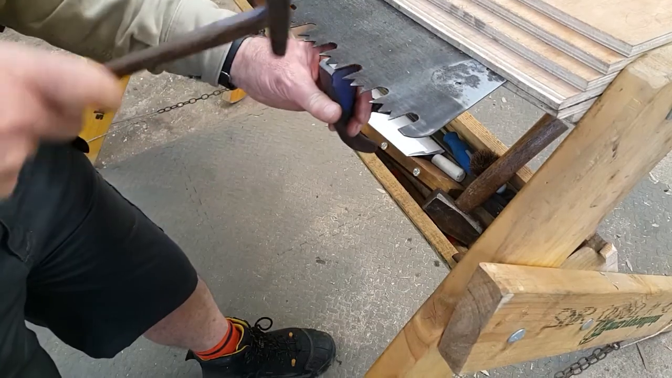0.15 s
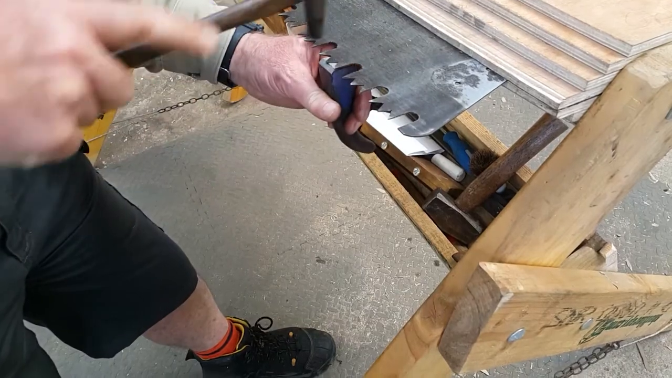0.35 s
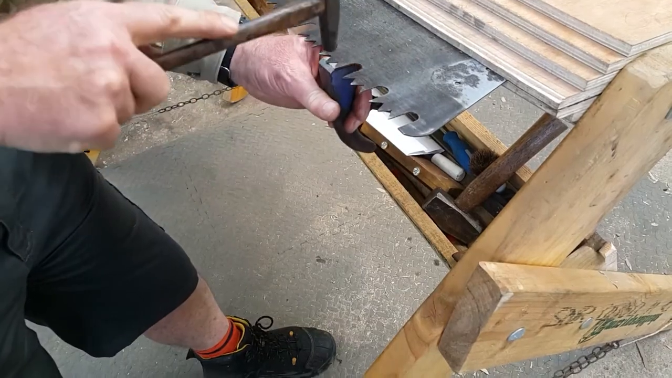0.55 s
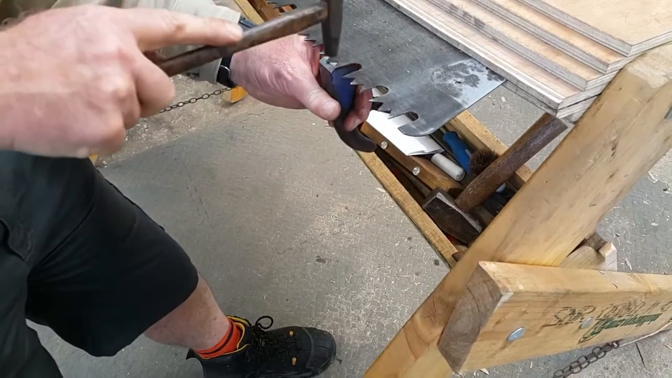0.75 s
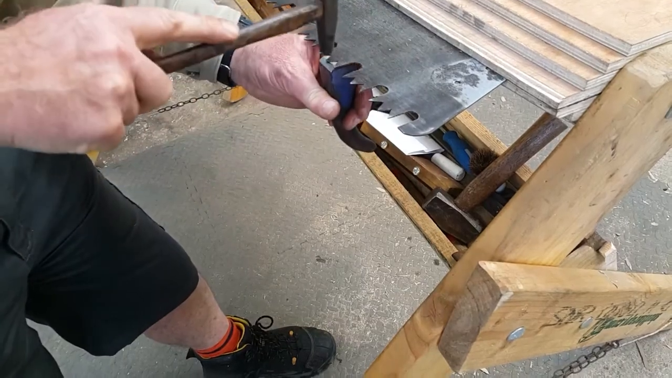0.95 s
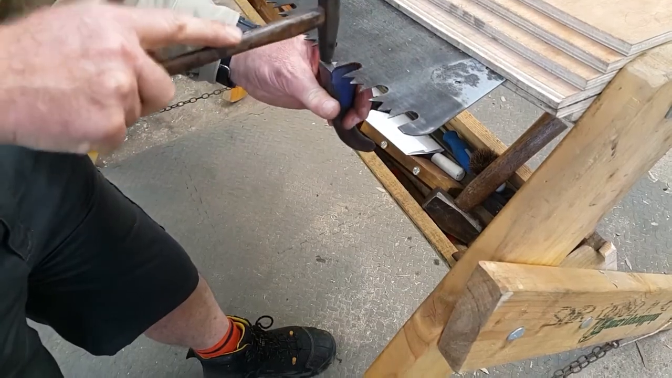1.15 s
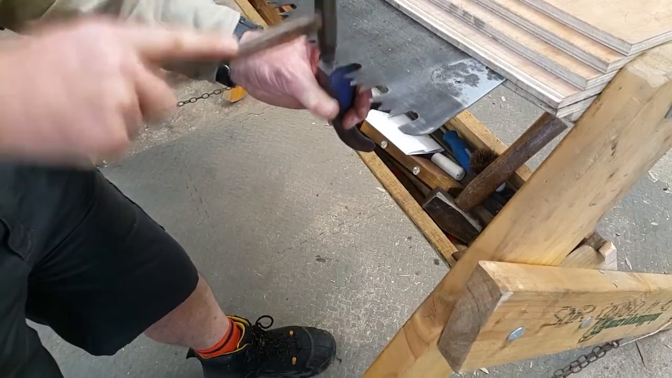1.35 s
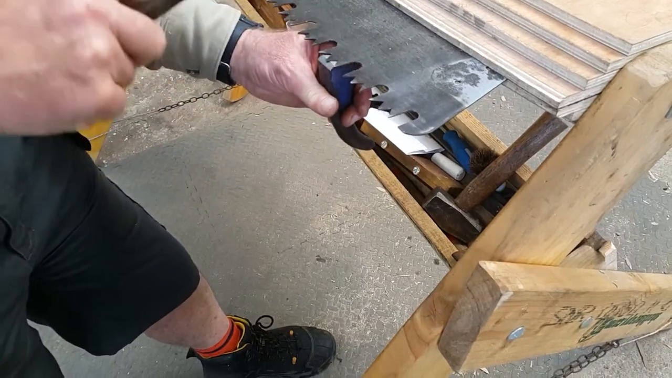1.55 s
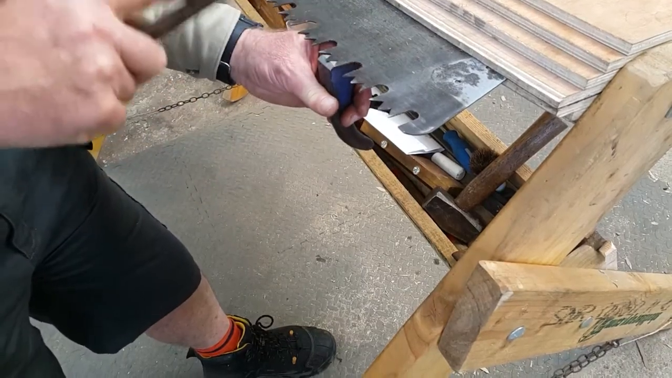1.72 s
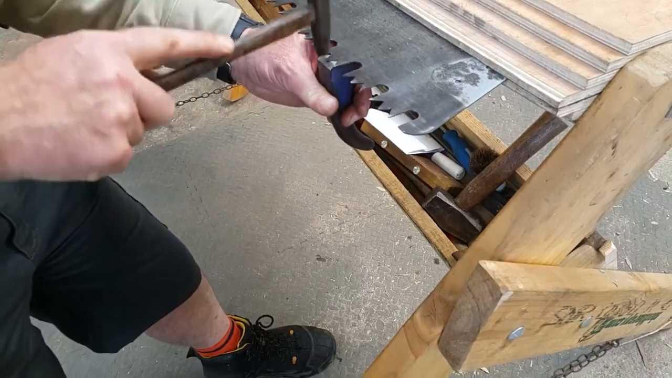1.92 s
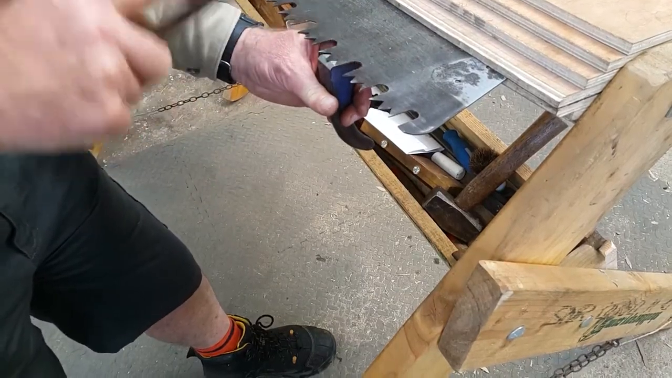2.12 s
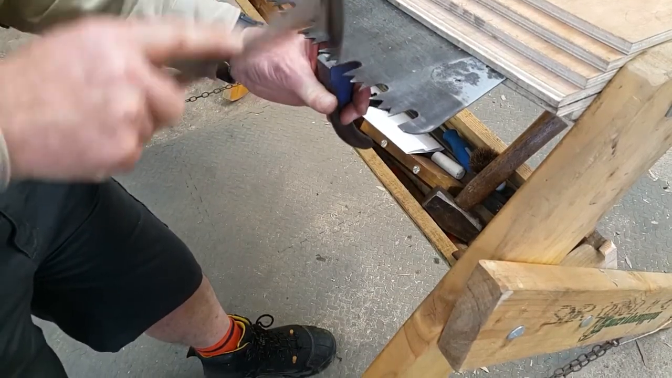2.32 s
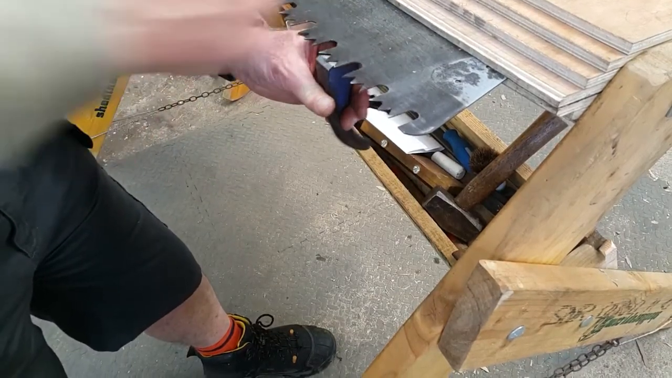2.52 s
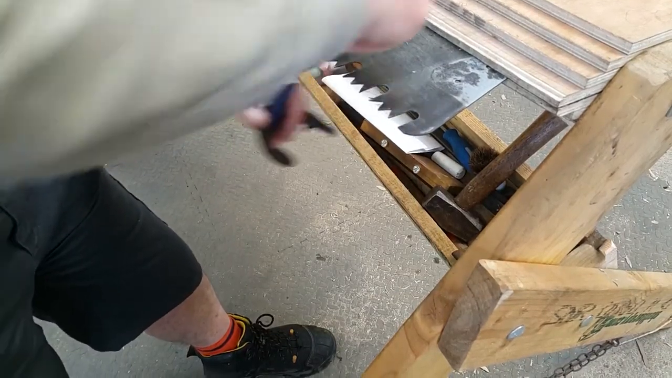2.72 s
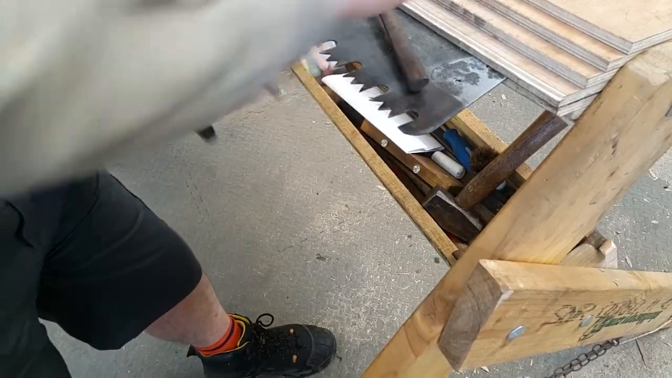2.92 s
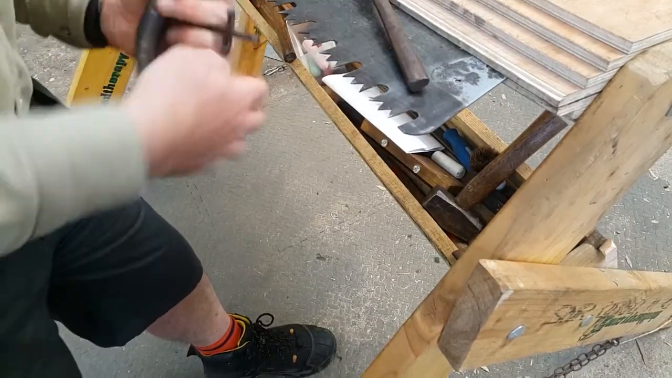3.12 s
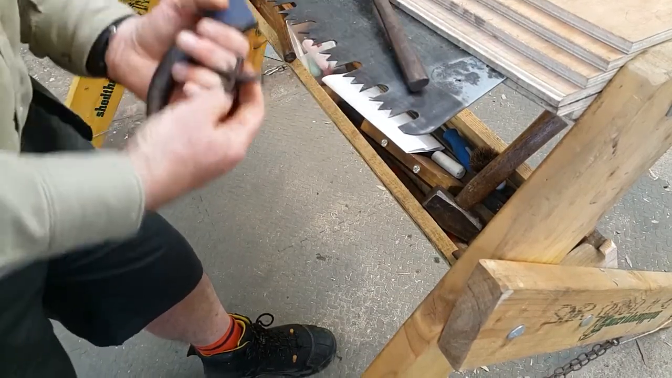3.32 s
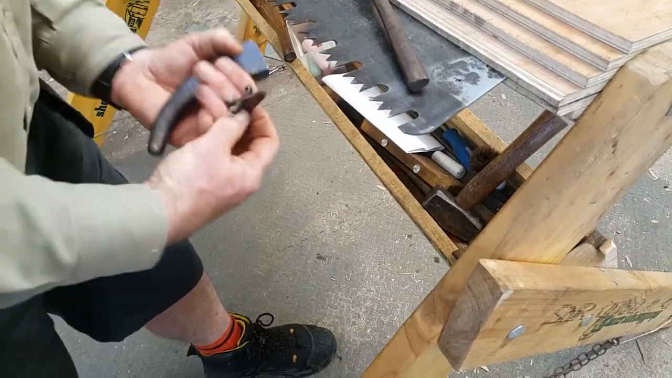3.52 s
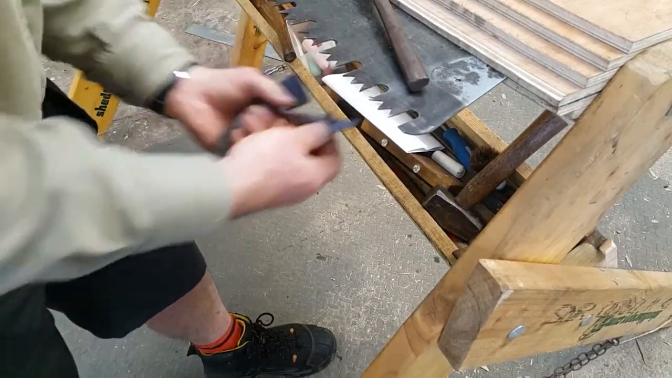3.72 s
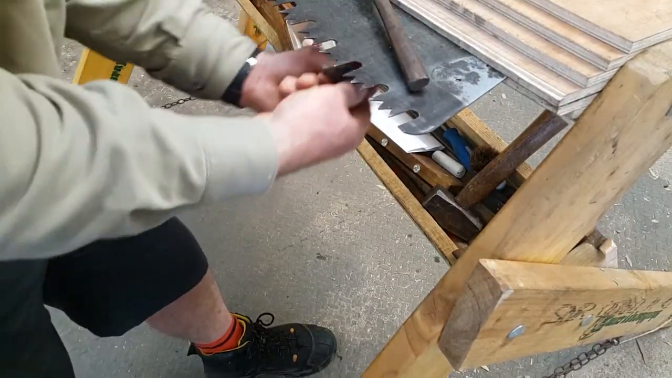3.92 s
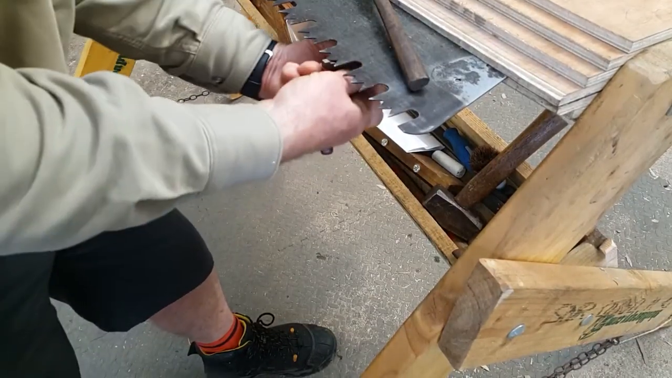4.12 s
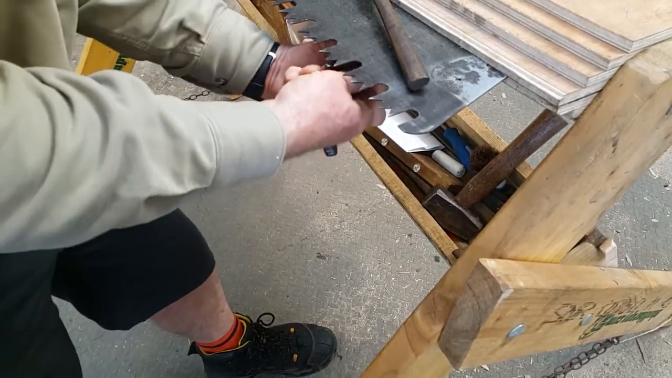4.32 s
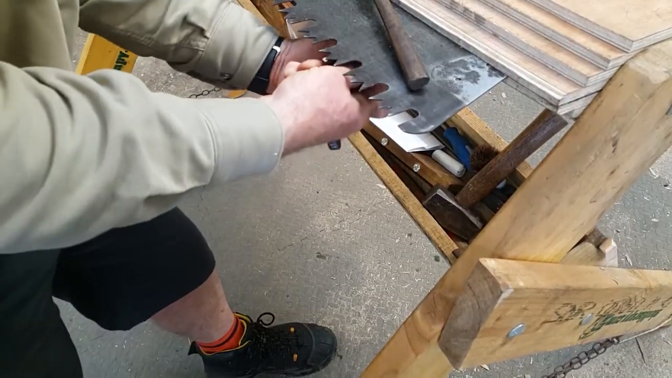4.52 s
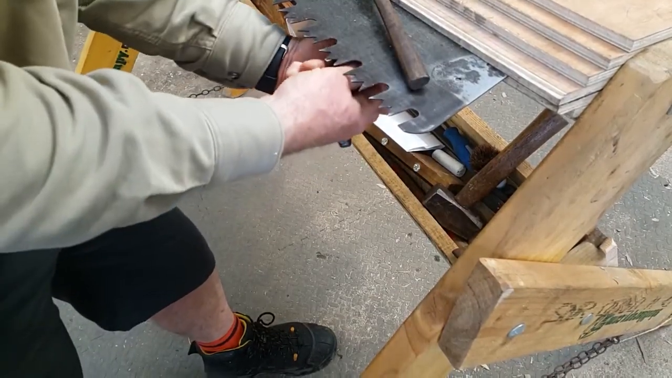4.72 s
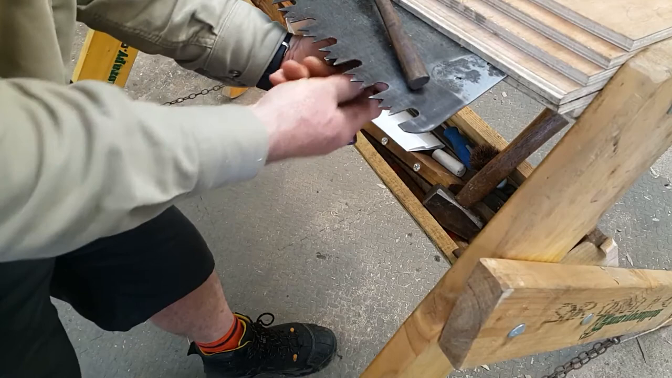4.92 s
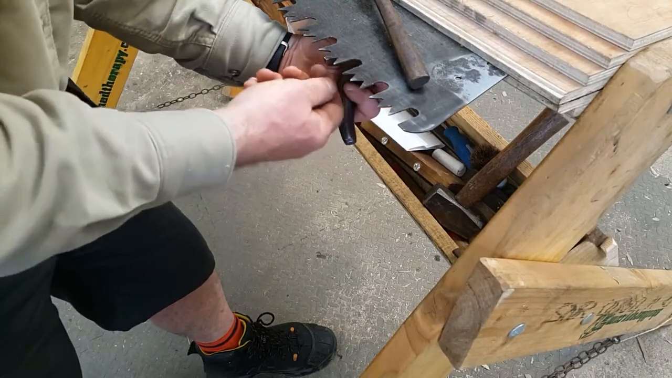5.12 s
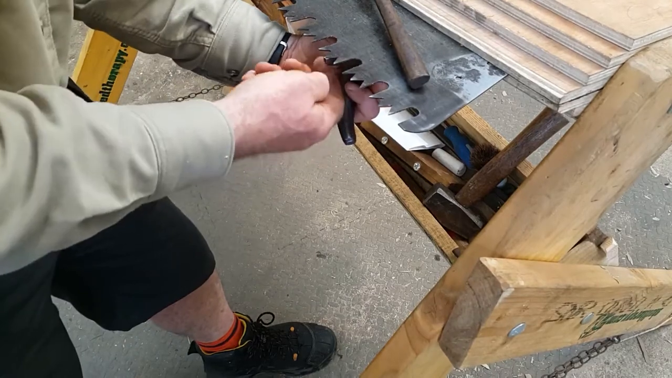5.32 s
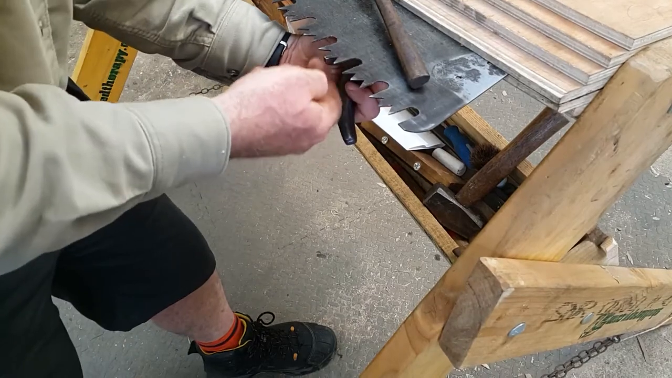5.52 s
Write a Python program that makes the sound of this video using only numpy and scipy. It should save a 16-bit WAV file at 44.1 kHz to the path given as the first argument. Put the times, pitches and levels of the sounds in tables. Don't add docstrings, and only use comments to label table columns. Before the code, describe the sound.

After soft knocks and sleeve rustle, two pairs of contacts: a low ringing metal clunk as the anvil is seated, then a loud, hard hammer blow with a short high ring and a thin blade tone singing after. A bouncing hammer clatters on a board-like bench. Handling sounds and small dry clicks finish, heard at arm's length in a reverberant workshop.

```python
import sys
import numpy as np
from scipy import signal
from scipy.fft import rfft, irfft, next_fast_len
from scipy.io import wavfile
from scipy.ndimage import uniform_filter1d, minimum_filter1d

SR = 44100
rng = np.random.default_rng(int(sys.argv[2]) if len(sys.argv) > 2 else 0)


def nominal_scale(level):
    x = np.asarray(level, float) / 20
    return 10 ** x


def to_wav(s):
    ch = np.atleast_2d(s).T
    pcm = np.round(np.clip(ch, -1, 1) * 32767)
    wavfile.write(sys.argv[1], SR, pcm.astype(np.int16))


N = 245107

# (time [s], peak [dB], dullness [dB], sparkle [dB], room [dB])
BLOW_HITS = [
    (1.51, -14, 3.5, 2, 13.5),
    (2.425, -15, -1, -2.5, 12.5),
]
# (frequency [Hz], level [dB], t60 [s])
ANVIL_MODES = [(431, -9, .12), (1779, -7, .07), (2020, -8, .04), (4254, -7, .07), (4394, 1.5, .09),
               (5185, -6, .05), (5437, -8, .06), (6112, -9, .07), (7324, -8, .06), (7997, -9, .15),
               (8031, -9, .15), (10150, -15, .09), (11051, -9, .07)]
# (frequency [Hz], level [dB per Hz])
ANVIL_COLOUR = [(60, -45.5), (200, -19.5), (290, -10), (450, -10), (760, -13.5), (1500, -10.5),
                (3000, -4.5), (4600, -4.5), (5600, 0), (7800, -5), (9000, -15.5), (12200, -11.5),
                (12900, -49.5), (16000, -60)]


def hammer_blows():
    return strike(BLOW_HITS, ANVIL_MODES, ANVIL_COLOUR, gain_db=29, ring_db=-11.5, sing_db=17,
                  edge_db=3.0, pan_db=5.3, hall_db=-29.5)


SEAT_HITS = [
    (1.166, -11.5, -5.5, 1, 10),
    (1.181, -19.5, -1.5, -6, 4.2),
    (2.119, -16.5, 2.5, -1.5, 13.7),
]
# (frequency [Hz], level [dB], t60 [s])
VICE_MODES = [(313, -9, .15), (365, -7, 0.095), (436, -2, .15), (619, -14, 0.53), (812, -12, .25),
              (920, 1, 0.28), (946, -2.5, 0.47), (1182, -7, 0.47), (1362, -14, .2)]
# (frequency [Hz], level [dB per Hz])
VICE_COLOUR = [(60, -50.5), (200, -35.5), (295, -3.5), (430, -1), (740, -11.5), (950, -8), (1500, -16),
               (3000, -18.5), (4500, -25.5), (5600, -21), (7200, -22), (9000, -37.5), (16000, -52.5)]


def anvil_seats():
    return strike(SEAT_HITS, VICE_MODES, VICE_COLOUR, gain_db=5.0, ring_db=-6, sing_db=5.5,
                  edge_db=2.0, pan_db=2.5, hall_db=-21)


DROP_HITS = [
    (2.847, -7, 2.5, 0, 9.5),
    (2.952, -14, 2.5, -7, 8),
    (3.035, -11, -12, -12.5, 4.8),
]
# (frequency [Hz], level [dB], t60 [s])
BENCH_MODES = [(432, -4, 0.22), (528.6, 7.5, 0.084), (748, -14.5, 0.39), (915, -7, 0.17), (1001, -13, 1),
               (1340, 7.5, 0.064), (1740, -17, 0.14), (2450, 4, 0.06), (4600, -2, .06), (5658, 6, 0.1),
               (6500, -3.5, .15)]
# (frequency [Hz], level [dB per Hz])
BENCH_COLOUR = [(60, -45.5), (200, -17), (280, -21), (460, 0.5), (1300, -6), (2700, -7.5), (4000, -11.5),
                (5700, -2.5), (7500, -5.5), (9000, -12), (12000, -24), (16000, -38)]


def hammer_drops():
    return strike(DROP_HITS, BENCH_MODES, BENCH_COLOUR, gain_db=12, ring_db=-9.5, sing_db=6.5,
                  edge_db=1, pan_db=0.5, hall_db=-12.5)


GAUGE_HITS = [
    (4.579, -32, 23.5, 6, 15.2),
    (4.592, -7, -18.5, -2, 1.6),
    (4.765, -20.5, 8.5, 7, 2.3),
    (4.897, -38, -7, 5, 6.5),
    (5.431, -51, 14, -9.5, 1.5),
]
# (frequency [Hz], level [dB], t60 [s])
GAUGE_MODES = [(540, 2, 0.04), (1402, -1, 0.022), (2364, -3, 0.025), (4270, -8, .02), (5600, -4, .03)]
# (frequency [Hz], level [dB per Hz])
GAUGE_COLOUR = [(60, -43), (200, -18), (300, -11), (550, 2.5), (1400, -1.5), (3000, -8.5), (4400, -7.5),
                (5800, -1), (7500, -7), (9500, -17.5), (16000, -39)]


def gauge_clicks():
    return strike(GAUGE_HITS, GAUGE_MODES, GAUGE_COLOUR, gain_db=0.96, ring_db=-18, sing_db=3.5,
                  edge_db=3.0, pan_db=2.0, hall_db=-10.5)


TAP_HITS = [(0.148, -38, 6.5, -13, 13.4), (0.228, -15, -4.2, 1.8, 7.6), (0.269, -28.5, 6, 11, 10.6),
            (0.439, -41, -4, 6, 13), (0.55, -45, -19, -3, 11), (3.311, -41, -3, -14, 3),
            (4.151, -38.5, -12, -3, 8.1), (4.339, -49.5, 13, 8, 25)]
# (frequency [Hz], level [dB], t60 [s])
WOOD_MODES = [(292, -8.5, 0.17), (458, -9.5, 0.1), (684, -13, 0.16)]
# (frequency [Hz], level [dB per Hz])
WOOD_COLOUR = [(60, 5), (200, -25.5), (282, -5.5), (540, -10.5), (1500, -13), (3500, -15), (5800, -16.5),
               (8000, -23.5), (16000, -32)]


def wood_taps():
    return strike(TAP_HITS, WOOD_MODES, WOOD_COLOUR, gain_db=-3.0, ring_db=-6.5, sing_db=8.0,
                  edge_db=-4.0, pan_db=2.1, hall_db=-24)


# (time [s], level [dB], hold [s], t60 [s])
BLADE_SWELLS = [
    (1.515, -28, 0.041, 0.77),
    (2.125, -47.5, 0.051, 0.58),
    (2.43, -26, 0.06, 0.42),
    (3.32, -60.5, 0.34, 1.9),
]


def blade():
    t = np.arange(N) / SR
    size = np.zeros(N)
    for start, db, hold_s, t60 in BLADE_SWELLS:
        since = np.maximum(t - start, 0)
        rise = 1 - np.exp(-since / (0.067 * hold_s))
        swell = rise * fade(np.maximum(since - hold_s, 0), t60)
        size = np.where(t < start, size, nominal_scale(db) * swell)
    hz = 1201 + 3.5 * (t - 2.5)
    ear_phase = np.array([[0], [.6]])
    return size * np.sin(2 * np.pi * np.cumsum(hz) / SR + ear_phase)


# (peak time [s], length [s], rub [dB], cloth [dB])
HAND_RUBS = [(0.425, 0.22, -63.5, -57.5), (0.638, 0.14, -66, -64), (.88, 0.036, -80, -59.5),
             (3.346, 0.055, -71, -112), (3.634, .14, -68.5, -61), (3.93, 0.58, -66, -62.5),
             (4.179, 0.057, -47, -64), (4.265, .12, -64.5, -77), (4.397, 0.24, -68, -80)]
# (time [s], length [s], frequency [Hz], level [dB])
EDGE_SQUEAKS = [
    (3.668, 0.13, 8700, -72),
    (4.174, 0.033, 8300, -63),
    (4.347, 0.022, 8130, -63),
]
# (frequency [Hz], width [Hz], level [dB])
RUB_BANDS = [(572, 310, 0), (1087, 260, -5), (1100, 1780, -2.5)]


def handling():
    t = np.arange(N) / SR
    grains = stereo_noise(N) * nominal_scale(2.9 * walk(90))
    rub = 0
    for hz, width, db in RUB_BANDS:
        rub = rub + nominal_scale(db) * band(grains, hz - width / 2, hz + width / 2) / np.sqrt(width)
    rub = rub / rub.std()
    cloth = band(grains, 4580, 7650)
    cloth = cloth / cloth.std()
    out = 0
    for peak_s, length, rub_db, cloth_db in HAND_RUBS:
        side = length * np.where(t < peak_s, 0.42, 0.58)
        gesture = np.exp(-((t - peak_s) / side) ** 2)
        out = out + gesture * (nominal_scale(rub_db) * rub + nominal_scale(cloth_db) * cloth)
    for centre, length, hz, db in EDGE_SQUEAKS:
        edge = band(rng.standard_normal(N), hz - 2 / length, hz + 2 / length, order=1)
        out = out + nominal_scale(db) * np.exp(-((t - centre) / length * 2) ** 4) * edge / edge.std()
    return out


# (frequency [Hz], level [dB per Hz])
HISS_COLOUR = [(25, -17), (60, -12), (200, -12), (271, -6), (355, -10), (650, -10.5), (1070, -18),
               (2800, -20), (4300, -23), (5700, -6), (7000, -16), (8500, -26.5), (12000, -25),
               (16000, -33.5)]
# (frequency [Hz], level [dB])
HUM_TONES = [(269, -82), (657, -75)]


def background():
    hiss = colour(stereo_noise(N), HISS_COLOUR)
    hiss = nominal_scale(-61.5 + 0.27 * walk(2.0)) * hiss / hiss.std()
    t = np.arange(N) / SR
    hum = 0
    for hz, db in HUM_TONES:
        hum = hum + nominal_scale(db + 4 * walk(2.5)) * np.sin(2 * np.pi * hz * t + 1.2 * walk(5))
    return (hiss + hum) * nominal_scale(0.82 * np.array([[-.5], [.5]]))


def drop_top(x):
    return signal.sosfilt(signal.ellip(8, .2, 60, 12500, fs=SR, output="sos"), x)


def mode_rings(modes, ring_db):
    t = np.arange(SR // 4) / SR
    rings = np.array([nominal_scale(db) * np.sin(2 * np.pi * hz * t) * fade(t, t60) for hz, db, t60 in modes])
    return nominal_scale(ring_db) * drop_top(rings) / np.sqrt(np.sum(rings ** 2))


# (low edge [Hz], high edge [Hz], t60 [s])
RATTLE_BANDS = [(60, 780, 0.079), (710, 3390, 0.041), (2700, 7450, 0.021), (8640, 9400, .0055)]


def contact_rattle(size):
    t = np.arange(size) / SR
    noise = rng.standard_normal(size)
    return sum(band(noise * fade(t, t60), lo, hi) / np.sqrt(t60) for lo, hi, t60 in RATTLE_BANDS)


def strike(table, modes, tone, gain_db, ring_db, sing_db, edge_db, pan_db, hall_db):
    rings = mode_rings(modes, ring_db)
    near, far, size = np.zeros(N + SR), np.zeros(N + SR), 4096
    edge = read([(500, 0.028), (5500, edge_db), (14000, edge_db + 12.5)], size)
    for start, peak_db, dull_db, sparkle_db, room_db in table:
        touch = [(400, dull_db), (1400, 0.42 * dull_db), (4500, 0.016), (11000, sparkle_db)]
        db = read(tone, size) + read(touch, size)
        ring = nominal_scale(2 * rng.standard_normal(len(modes))) @ rings
        burst = signal.fftconvolve(contact_rattle(size), pulse(db + edge))
        burst = burst / np.abs(burst).max()
        level_db = peak_db + gain_db
        i = int((start + .0012) * SR)
        near[i:i + len(burst)] += nominal_scale(level_db - 2.5) * burst
        near[i:i + len(ring)] += nominal_scale(level_db + sing_db) * ring
        far[i:i + size] += nominal_scale(level_db + room_db) * pulse(db)
        far[i:i + len(ring)] += nominal_scale(level_db + room_db) * ring
    echoes = room(build_s=.008, patchy_db=3, hall_db=hall_db)
    wet = signal.fftconvolve(drop_top(far)[None, :N], echoes, axes=1)[:, :N]
    late = np.roll(near, 2)
    direct = np.array([nominal_scale(pan_db / 2) * late, nominal_scale(-pan_db / 2) * near])
    return direct[:, :N] + wet


# (frequency [Hz], t60 [s])
ROOM_DECAY = [(150, 0.49), (400, 0.36), (1200, 0.46), (3500, 0.36), (7000, 0.28), (12000, 0.17)]


def room(build_s, patchy_db, hall_db):
    t = np.arange(SR * 2 // 3) / SR
    noise = stereo_noise(len(t))
    hz, t60 = np.transpose(ROOM_DECAY)
    out = 0
    for f in 90 * 2 ** np.arange(0, 7.6, .5):
        decay = fade(t, np.interp(np.log(f), np.log(hz), t60))
        out = out + band(noise, f / 2 ** .25, f * 2 ** .25, order=1) * decay
    out = out + nominal_scale(hall_db) * band(noise[:, ::-1], 330, 8700) * fade(t, 0.95)
    clumps = nominal_scale(patchy_db * walk(250)[:len(t)] * fade(t, .6))
    out = out * clumps * (1 - np.exp(-(t / build_s) ** 2))
    return out / np.sqrt(np.mean(np.sum(out ** 2, axis=1)))


# (frequency [Hz], likeness [0-1])
EAR_LIKENESS = [(60, 0.2), (250, 0.9), (600, 0.5), (1500, 0), (4000, 0), (16000, .05)]


def stereo_noise(size):
    mid, side = rng.standard_normal((2, size))
    likeness = [(hz, np.clip(c, 0, .99)) for hz, c in EAR_LIKENESS]
    mid = colour(mid, [(hz, 10 * np.log10((1 + c) / 2)) for hz, c in likeness])
    side = colour(side, [(hz, 10 * np.log10((1 - c) / 2)) for hz, c in likeness])
    return np.array([mid + side, mid - side])


def colour(x, table, share=0.87):
    size = next_fast_len(x.shape[-1])
    return irfft(rfft(x, size) * nominal_scale(share * read(table, size)), size)[..., :x.shape[-1]]


def band(x, lo_hz, hi_hz, order=2):
    edges = [lo_hz, min(hi_hz, .45 * SR)]
    return signal.sosfilt(signal.butter(order, edges, "bandpass", fs=SR, output="sos"), x)


def fade(t, t60):
    return np.exp(-np.log(1000) * t / t60)


def walk(rate):
    k = int(SR / rate)
    steps = np.repeat(rng.standard_normal(N // k + 1), k)
    return uniform_filter1d(uniform_filter1d(steps, k), k)[:N]


def read(table, size):
    hz = np.maximum(np.fft.rfftfreq(size, 1 / SR), 1)
    points_hz, points_db = np.transpose(table)
    return np.interp(np.log(hz), np.log(points_hz), points_db)


def pulse(db):
    c = irfft(np.log(nominal_scale(np.maximum(db, -70))))
    c[1:len(c) // 2] *= 2
    c[len(c) // 2 + 1:] = 0
    h = irfft(np.exp(rfft(c)))
    return h / np.sqrt(np.sum(h ** 2))


# (frequency [Hz], left minus right [dB])
PHONE_SHADE = [(60, 2.5), (110, 1.5), (200, -1.5), (380, -1), (700, 0.5), (1290, -3), (2380, 0), (4400, -4),
               (8120, 5.5), (15000, 13.5)]


def scene():
    near = hammer_blows() + anvil_seats() + hammer_drops() + gauge_clicks() + wood_taps()
    near = band(near, 170, 22000)
    near = np.array([colour(near[0], PHONE_SHADE, .5), colour(near[1], PHONE_SHADE, -.5)])
    return near + blade() + handling() + background()


def limiter(x, top_db, ahead_s, release_s):
    step = 44
    peak = np.abs(x).max(axis=0)[:N // step * step].reshape(-1, step).max(axis=1)
    cut = np.maximum(20 * np.log10(peak + 1e-9) - top_db, 0)
    for i in range(1, len(cut)):
        cut[i] = max(cut[i], cut[i - 1] * np.exp(-step / SR / release_s))
    k = int(ahead_s * SR / step)
    held = -minimum_filter1d(-cut, k, origin=-(k // 2))
    ramp = uniform_filter1d(held, k // 2, origin=(k // 2 - 1) // 2)
    return x * nominal_scale(-np.interp(np.arange(N), step * np.arange(len(cut)), ramp))


def low_pass(x):
    return signal.sosfilt(signal.butter(12, 16850, fs=SR, output="sos"), x)


def record(dry):
    held = limiter(dry, top_db=3.5, ahead_s=.04, release_s=0.45)
    clipped = np.clip(held, -.84, .84)
    mix = signal.sosfilt(signal.ellip(8, .2, 70, 15900, fs=SR, output="sos"), clipped)
    return low_pass(mix)


dry = scene()
out = record(dry)
to_wav(out)
```